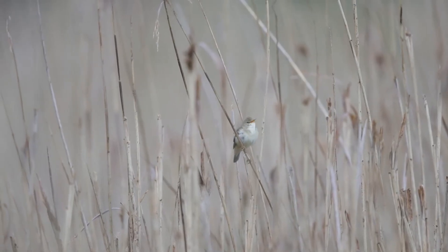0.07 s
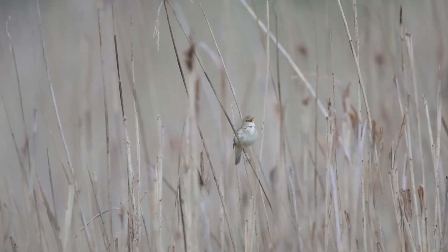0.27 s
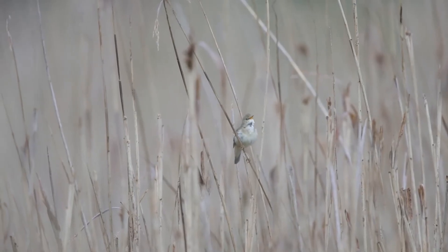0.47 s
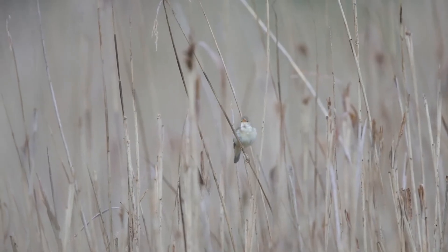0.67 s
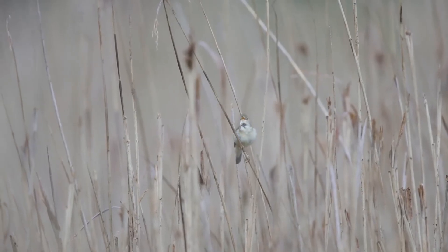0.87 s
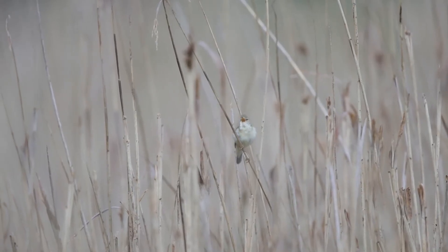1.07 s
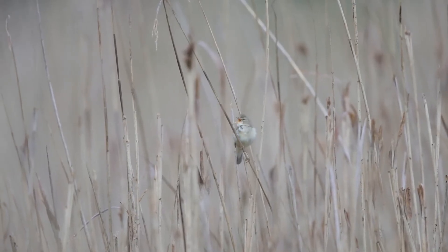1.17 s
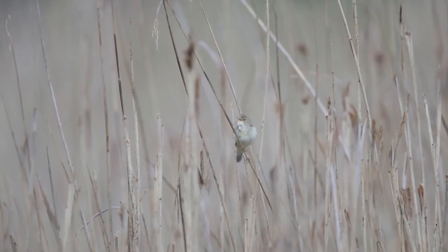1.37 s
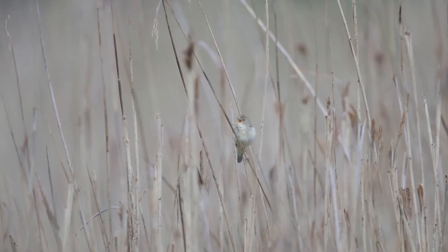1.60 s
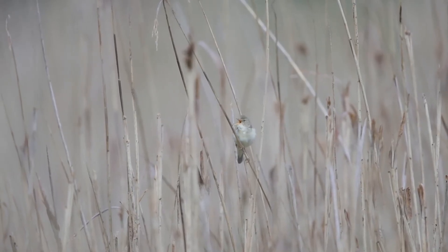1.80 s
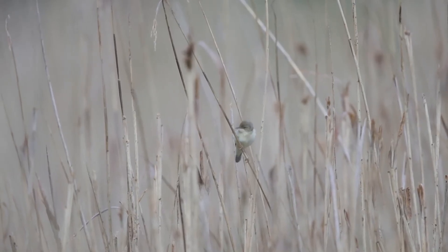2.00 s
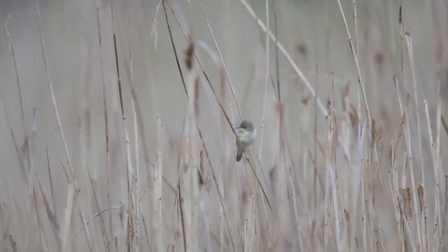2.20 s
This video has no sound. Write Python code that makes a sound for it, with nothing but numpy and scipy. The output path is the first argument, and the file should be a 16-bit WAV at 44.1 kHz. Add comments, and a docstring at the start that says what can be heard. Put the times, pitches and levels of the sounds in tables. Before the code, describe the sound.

Warbler song in a reed bed, close microphone. A dull stem tick at 0.02 s, then sharp chips alternate with rapid rising trills near 0.25, 0.6 and 1.0 s. Lower, clear whistles overlap behind from 0.2 to 2.0 s, with thin distant notes. Slides from 1.25, nasal squeaks around 1.6, four dry buzzes 1.7-1.95, faint scoops and reed rustle near 2.2. Soft hiss, low traffic and scattered echo throughout.

```python
"""At a reed bed: a stem snaps, then a warbler near the microphone alternates chips with three rising trills.
A lower-voiced bird soon whistles behind it, partly with two voices; a third adds thin notes farther off.
The warbler goes on to slides, nasal notes, four buzzes and, as the reeds brush briefly, three scoops.
Far traffic rumbles and the reeds hiss throughout. Birds are sines or overtone stacks with moving pitch,
each with a scattered echo of the reeds; the surroundings are shaped noise."""
import sys
import numpy as np
from scipy import signal
from scipy.fft import rfft, irfft, next_fast_len
from scipy.io import wavfile
from scipy.ndimage import uniform_filter1d, map_coordinates

SR = 44100
rng = np.random.default_rng(int(sys.argv[2]) if len(sys.argv) > 2 else 0)


def wrap_up_sound(samples):
    """Save the sound to the file named by the first command line argument, as 16-bit audio."""
    columns = np.atleast_2d(samples).T
    # keep every value between -1 and 1, then stretch to whole-number steps
    tamed = np.clip(columns, -1, 1)
    steps = np.round(tamed * 32767).astype(np.int16)
    wavfile.write(sys.argv[1], SR, steps)


N = 99225
T = np.arange(N) / SR  # time/s

EDGE_S = 0.00071  # usual length of a note's soft edge
WARBLER_ROUGH_DB = 3  # unsteadiness of level
OCTAVE_DB = -29.5  # overtone of a clear note

# Warbler trills, one row per peak of the warble: t/s, f/Hz
TRILL_PEAKS = [
    [(0.226, 2380), (0.2395, 2930), (0.2537, 3330), (0.2699, 3780), (0.2871, 3930), (0.3058, 4090),
     (0.324, 4104), (0.3402, 4320), (0.3554, 4174), (0.3684, 3930)],
    [(0.556, 2506), (0.572, 2903), (0.5874, 3224), (0.604, 3700), (0.6238, 3855), (0.64, 4085),
     (0.6565, 4100), (0.6747, 4140), (0.6899, 4346), (0.7041, 4396), (0.7206, 4450), (0.733, 4230)],
    [(0.9177, 2324), (0.9279, 2844), (0.9446, 3260), (0.9613, 3503), (0.979, 3893), (0.996, 4095),
     (1.0112, 4286), (1.0274, 4355), (1.0449, 4250), (1.0628, 4320), (1.0823, 4480), (1.0988, 4425),
     (1.113, 4360)],
]
# Per trill: first valley f/Hz, last valley f/Hz, first level/dB, level/dB at the last peak but one
TRILL_RANGES = [(2057, 3450, -42, -33.5), (2090, 3600, -40, -34.5), (2074, 3600, -40.5, -35.5)]
VALLEY_DB, LAST_PEAK_DB = -5, -8  # valleys against peaks, last peak against the one before


def trills():
    """The pitch swings between climbing valleys and the peaks, louder on top; the trill swells."""
    out = np.zeros(N)
    for rows, (valley0, valley1, db0, db1) in zip(TRILL_PEAKS, TRILL_RANGES):
        s, top = np.transpose(rows)
        knots = np.r_[s[0] - .012, s, s[-1] + .012]
        cycles = np.interp(T, knots, np.arange(len(knots)))  # one cycle from peak to peak
        high = .5 + .5 * np.cos(2 * np.pi * cycles)
        peak = np.interp(T, s, top)
        valley = np.interp(T, s[[0, -1]], [valley0, valley1])
        valley = np.minimum(valley, peak - 200)
        db = np.interp(T, s[[0, -2, -1]], [db0, db1, db1 + LAST_PEAK_DB])
        db += VALLEY_DB * (1 - high)
        level = amp(db) * gate(s[0] - .006, s[-1] + 0.0045)
        out += tone(valley + (peak - valley) * high, level, OCTAVE_DB, WARBLER_ROUGH_DB)
    return out


# Warbler chips: t/s at the top, top f/Hz, level/dB, fall t/s, level/dB at the foot of the sweep against the top
CHIP_NOTES = [(.118, 6824, -35.5, 0.0044, -12.5), (0.459, 6610, -35.5, 0.002, -6),
              (.809, 6520, -33.5, 0.0055, -10), (1.192, 6470, -33.5, 0.0062, -9.5),
              (1.439, 6350, -37, 0.011, -8.5), (1.502, 6450, -49, 0.015, 5)]
CHIP_RISE_S, CHIP_DROP_HZ, CHIP_BEND = .0135, 3976, 2.4  # rise time, foot below top, roundness
CHIP_OCTAVE_DB = -5  # overtone at the foot; far weaker on top


def chips():
    """A fast sweep up, rounded on top, and a sweep down, shorter in all but the last chip."""
    out = np.zeros(N)
    for s, top, db, fall, foot_db in CHIP_NOTES:
        from_top = np.minimum(abs(T - s) / CHIP_RISE_S, 1)
        hz = top - CHIP_DROP_HZ * from_top ** CHIP_BEND
        level = amp(db + foot_db * from_top) * gate(s - CHIP_RISE_S, s + fall)
        overtone_db = CHIP_OCTAVE_DB + 2 * OCTAVE_DB * (1 - from_top)
        out += tone(hz, level, overtone_db, rough_db=1.1)
    return out


# Warbler slides, one list per note: t/s, f/Hz, level/dB
SLIDE_NOTES = [
    [(1.247, 2100, -48), (1.252, 2860, -38), (1.2615, 4640, -49), (1.266, 3510, -38), (1.269, 4300, -46),
     (1.273, 3290, -35), (1.277, 3580, -36), (1.3, 4020, -32.5), (1.318, 4600, -37.5), (1.348, 5570, -48)],
    [(1.555, 3260, -49), (1.5585, 4700, -40), (1.563, 3220, -42)],
    [(2.117, 2920, -49), (2.123, 3950, -58), (2.131, 3003, -49.5), (2.17, 2665, -51)],
]
# Flutter by slide index: t/s at a crest, fade-out t/s, first and last rate f/Hz, swing f/Hz, throb as a fraction
SLIDE_FLUTTER = {0: (1.301, 0.041, 140, 140, 92, 0.3)}
# Warbler scoops: t/s at the start, level/dB
SCOOP_STARTS = [(2.184, -47.5), (2.206, -45.5), (2.228, -44.5)]
# Shape shared by the scoops: t/s after the start, f/Hz, level/dB against the scoop's own
SCOOP_SHAPE = [(0, 4460, -0.5), (.004, 2984, -2), (.010, 2190, 2), (.020, 4040, -2.5)]


def slides_and_scoops():
    """Whistled glides, and dips in pitch that climb again, each with a weak octave."""
    scoops = [[(s + after, hz, db + rel) for after, hz, rel in SCOOP_SHAPE] for s, db in SCOOP_STARTS]
    return whistles(SLIDE_NOTES + scoops, SLIDE_FLUTTER, -24.5, WARBLER_ROUGH_DB)


# Pass band of the warbler's beak: f/Hz, level/dB
BEAK_BAND = [(2000, -13), (3200, -9), (4200, -1.5), (6200, 1), (7500, -4.5), (9000, -24), (11000, -30)]


def stack(hz, level, rough_db, count, order=1):
    """Unsteady overtones from order to count, weighted by the beak's pass band."""
    phase = 2 * np.pi * np.cumsum(hz) / SR
    out = np.zeros(N)
    for k in range(order, count + 1):
        weight = amp(along(BEAK_BAND, k * hz) + rough_db * wobble(150))
        out += weight * np.sin(k * phase + rng.normal())
    return level * out


# Nasal notes, one list per note: t/s, pitch f/Hz, level/dB before the beak
NASAL_NOTES = [
    [(1.563, 2710, -44), (1.568, 2174, -52), (1.574, 1766, -57), (1.582, 1590, -47.5), (1.594, 2106, -45.5),
     (1.609, 3150, -44.5)],
    [(1.65, 2260, -42), (1.663, 2190, -44.5), (1.693, 2497, -41.5)],
]


def nasal_notes():
    """Gliding pitch with five harmonics through the beak."""
    return sum(stack(*read(rows), WARBLER_ROUGH_DB, count=5) for rows in NASAL_NOTES)


# Buzzes: t/s at the start, length t/s, level/dB before halving and the beak
BUZZ_NOTES = [(1.686, 0.0173, -45.5), (1.734, 0.041, -44.5), (1.815, 0.046, -42.5), (1.899, 0.043, -45.5)]
BUZZ_HZ, BUZZ_JITTER = 463, 0.057  # pitch, rms jitter as a fraction
BUZZ_SWELL_DB, BUZZ_EDGE_S = -7, 0.012  # level at the start against full, soft edge


def buzzes():
    """High overtones of an unsteady low pitch, swelling over the first part of each buzz."""
    shake = uniform_filter1d(rng.standard_normal(N), size=130)
    hz = BUZZ_HZ * np.exp(BUZZ_JITTER * shake / shake.std())
    level = np.zeros(N)
    for s, length, db in BUZZ_NOTES:
        still_to_swell = np.clip(1 - (T - s) / length / 0.73, 0, 1)
        level += amp(db + BUZZ_SWELL_DB * still_to_swell) * gate(s, s + length, BUZZ_EDGE_S)
    return stack(hz, level / 2, rough_db=5.5, count=24, order=9)


# Whistles of the lower bird behind, one list per note: t/s, f/Hz, level/dB
LOW_NOTES = [
    [(.165, 1540, -50), (.203, 1666, -41.5), (.217, 1715, -32.5), (.236, 1730, -45.5), (.243, 1737, -33.5),
     (.257, 1744, -45), (.27, 1797, -34.5), (.285, 1828, -49), (.303, 1853, -28), (.316, 1842, -47.5),
     (.347, 1854, -34)],
    [(.348, 1883, -50), (.352, 2147, -32), (.41, 2150, -26.5), (.422, 2410, -34), (.433, 2780, -37),
     (.46, 2622, -28), (.468, 2503, -32.5), (.478, 2337, -27.5), (.495, 2020, -29), (.51, 1618, -42.5)],
    [(.618, 2805, -38.5), (.66, 2510, -30), (.715, 2409, -23), (.748, 2324, -30), (.77, 2293, -24.5),
     (.815, 2213, -25.5), (.828, 2203, -30.5), (.834, 2042, -35)],
    [(.957, 1956, -41), (.981, 2787, -44), (.988, 2950, -29), (.995, 2910, -48), (1.0, 2930, -33),
     (1.011, 3100, -34.5)],
    [(1.332, 2140, -45), (1.395, 2083, -31), (1.412, 1976, -36), (1.46, 2010, -32.5), (1.55, 2056, -34.5),
     (1.572, 2090, -36), (1.577, 1794, -48)],
    [(1.628, 1684, -45), (1.726, 1721, -44), (1.775, 1603, -54)],
    [(1.635, 2510, -46), (1.652, 2408, -41), (1.663, 2375, -48), (1.675, 2376, -42.5), (1.743, 2505, -42),
     (1.785, 2340, -50)],
    [(1.855, 2064, -40), (1.878, 2193, -36), (1.945, 2171, -40), (1.968, 2012, -34.5), (1.984, 1630, -44)],
    [(1.865, 2357, -43.5), (1.93, 2723, -39.5), (1.958, 2630, -37), (1.985, 2170, -41)],
    [(2.0, 2470, -42.5), (2.032, 2020, -47)],
]
# Flutter by note index: t/s at a crest, fade-out t/s, first and last rate f/Hz, swing f/Hz, throb as a fraction
LOW_FLUTTER = {1: (.352, 0.083, 67.6, 131, 316, 0.071), 2: (.622, 0.073, 125, 145, 170, 0.194),
               4: (1.335, 0.083, 95, 89, 33, 1.1), 5: (1.642, 2.5, 46.8, 52, 4, 1.16)}


def low_bird():
    """Pure whistles with a faint third harmonic; overlapping notes make two voices."""
    return whistles(LOW_NOTES, LOW_FLUTTER, -41, rough_db=1.37, order=3)


# Thin faint notes farther off, one list per note: t/s, f/Hz, level/dB
FAR_NOTES = [
    [(1.089, 7250, -46), (1.099, 8280, -50.5), (1.14, 7130, -46), (1.155, 6940, -49)],
    [(.625, 8250, -55), (.76, 6950, -56)],
    [(1.385, 3655, -51.5), (1.435, 3150, -50)],
    [(.484, 3260, -44), (.516, 2390, -48.5)],
    [(1.806, 3560, -52), (1.821, 3410, -52)],
    [(1.84, 3450, -51), (1.863, 3020, -49)],
]


def far_bird():
    """Thin falling or arched whistles with a weak octave."""
    return whistles(FAR_NOTES, {}, OCTAVE_DB, rough_db=3.5)


# Decay in the reed bed: f/Hz, t/s to fall 60 dB
REED_DECAY = [(1500, 0.38), (4000, 0.51), (7000, 0.41)]
NEAR_T60_S, NEAR_DB = 0.045, 3.5  # near stems: time to fall 60 dB, starting level against the long tail


def echo(x, db):
    """Scattered answer of the reed bed: near stems first, then a long tail."""
    hz, t, z = signal.stft(rng.standard_normal(SR // 2), SR, nperseg=256)
    long_tail = amp(-60 * t / along(REED_DECAY, hz)[:, None])
    near_stems = amp(NEAR_DB - 60 * t / NEAR_T60_S)
    tail = signal.istft(z * (long_tail + near_stems), SR, nperseg=256)[1]
    tail /= np.linalg.norm(tail)
    delayed = np.pad(x, (200, 0))  # samples
    return x + amp(db) * signal.fftconvolve(delayed, tail)[:N]


# Snapping stem: t/s, length t/s, level/dB before dulling, corner f/Hz of the dulling
STEM_SNAP = (.02, .003, -29, 2500)


def stem_snap():
    """A tick of white noise, dulled by two first-order low-passes."""
    s, length, db, dull_hz = STEM_SNAP
    burst = amp(db) * gate(s, s + length) * rng.standard_normal(N)
    return filtered(burst, lambda f: (1 + 1j * f / dull_hz) ** -2)


# Reeds brushing: t/s at the start, length t/s, level/dB before the grain
BRUSHES = [(2.165, 0.0405, -48.5)]
# Colour of the brushing: f/Hz, level/dB per Hz
BRUSH_COLOUR = [(5000, -19), (9000, -12.5)]


def reed_brush():
    """A brief rustle: bright noise whose level jumps every 88 samples."""
    level = sum(amp(db) * gate(s, s + length, BUZZ_EDGE_S) for s, length, db in BRUSHES)
    grain = amp(3.5 * np.repeat(rng.standard_normal(N // 88 + 1), 88)[:N])
    return level * grain * noise(BRUSH_COLOUR, 0, SR)


# Colour of the reed hiss: f/Hz, level/dB per Hz
HISS_COLOUR = [(1200, -8), (2050, 0), (3690, -10), (5200, -17), (9570, -15), (15500, -26)]
# Course of the hiss: t/s, level/dB within 8500-15000 Hz before a slight wobble
HISS_COURSE = [(0, -64), (.85, -64.5), (1.03, -60), (1.35, -67), (1.94, -59.5), (2.12, -66.5), ]


def reed_hiss():
    """Broad noise of the reeds that slowly rises and falls."""
    level = amp(1.5 * wobble(12) + np.interp(T, *np.transpose(HISS_COURSE)))
    return level * noise([(900, -60)] + HISS_COLOUR, 8500, 15000)


# Colour of the far traffic: f/Hz, level/dB per Hz
RUMBLE_COLOUR = [(25, -25), (54, -9.5), (139, -1.5), (176, -5.5), (240, 0), (394, -2.5), (882, -1),
                 (1500, -14)]


def traffic_rumble():
    """Steady low noise of far traffic, -43 dB rms within 25-1330 Hz."""
    return amp(-43) * noise(RUMBLE_COLOUR + [(2200, -53.0)], 25, 1330)


def whistles(notes, flutters, overtone_db, rough_db, order=2):
    """Pure notes; some flutter in pitch and level, the flutter fading out."""
    out = np.zeros(N)
    for k, rows in enumerate(notes):
        hz, level = read(rows)
        if k in flutters:
            s, length, first, last, swing, throb = flutters[k]
            after = T - s
            cycles = after * (first + (last - first) * after / (2 * length))
            wave = np.cos(2 * np.pi * cycles) * np.clip(1 - after / length, 0, 1)
            wave *= T > s - .5 / first  # from the trough before the crest
            hz = hz + swing * wave
            level = level * (1 + throb * wave)
        out += tone(hz, level, overtone_db, rough_db, order)
    return out


def read(rows):
    """Smoothed pitch and gated gain of a note."""
    s, hz, db = np.transpose(rows)
    pitch = uniform_filter1d(np.interp(T, s, hz), size=66)
    return pitch, amp(np.interp(T, s, db)) * gate(s[0], s[-1])


def tone(hz, level, overtone_db, rough_db, order=2):
    """An unsteady sine of rms near level, with one overtone."""
    unsteady_hz = hz * (1 + 0.00295 * rough_db * wobble(300))
    phase = 2 * np.pi * (np.cumsum(unsteady_hz) / SR + rng.random())
    overtone = amp(overtone_db + 2.6 * wobble(150)) * np.sin(order * phase)
    return np.sqrt(2) * level * amp(rough_db * wobble(200)) * (np.sin(phase) + overtone)


def gate(start, end, edge=EDGE_S):
    """Soft-edged on and off."""
    return np.clip(np.minimum(T - start, end - T) / edge + .5, 0, 1)


def wobble(rate):
    """A random curve of straight pieces, rate knots a second."""
    knots = rng.standard_normal(int(N * rate / SR) + 4)
    return map_coordinates(knots, [T * rate], order=1)


def noise(spectrum, lo_hz, hi_hz):
    """Coloured noise, rms 1 inside the band but not limited to it."""
    white = rng.standard_normal(N)
    band = filtered(white, lambda f: amp(along(spectrum, f)) * (f > lo_hz) * (f < hi_hz))
    return filtered(white, lambda f: amp(along(spectrum, f))) / band.std()


def filtered(x, response):
    """x with its spectrum multiplied by a response of frequency."""
    m = next_fast_len(N + 8192)
    return irfft(rfft(x, m) * response(np.fft.rfftfreq(m, 1 / SR)), m)[:N]


def along(points, hz):
    """Values between (f/Hz, value) points on a log frequency axis."""
    f, v = np.transpose(points)
    return np.interp(np.log(hz + 1), np.log(f + 1), v)


def amp(db):
    """dB to gain."""
    return 10 ** (np.asarray(db) / 20)


def scene():
    """The near warbler, the birds behind it in their echoes, and the reeds and traffic around."""
    calls = chips() + slides_and_scoops() + nasal_notes() + buzzes()
    warbler = echo(trills(), -5.5) + echo(calls, -5.5)
    others = echo(low_bird(), -10) + echo(far_bird(), -5.5)
    background = stem_snap() + reed_brush() + reed_hiss() + traffic_rumble()
    return (warbler + others + background)[None]


def record(dry):
    """One microphone channel with nothing from 15720 Hz up."""
    return filtered(dry[0], lambda hz: hz < 15720)[None]


dry = scene()
out = record(dry)
wrap_up_sound(out)
```